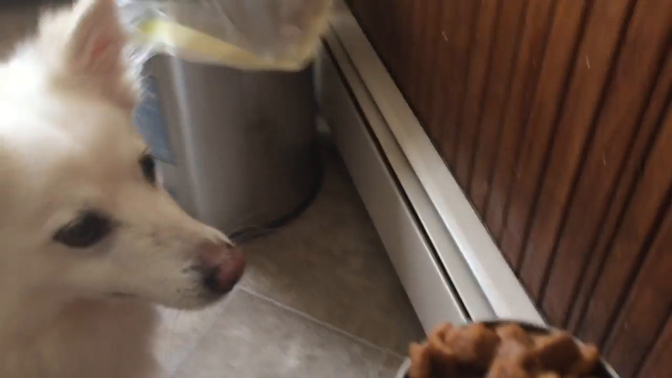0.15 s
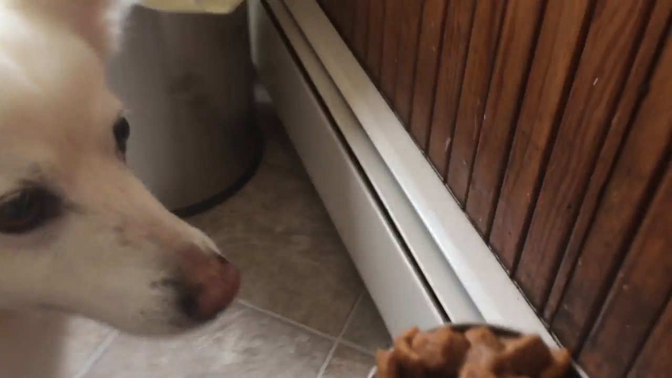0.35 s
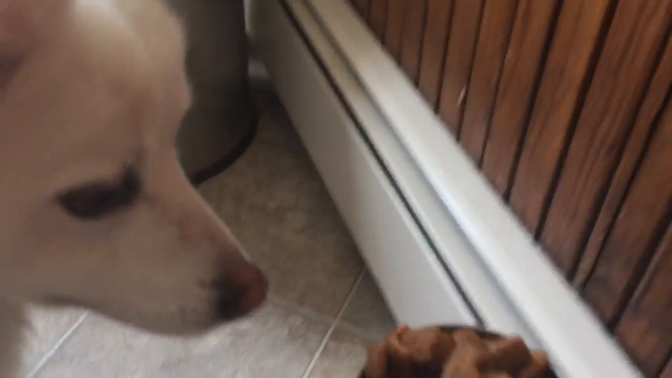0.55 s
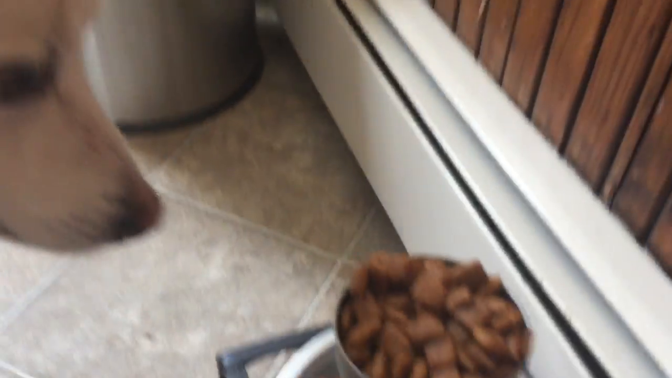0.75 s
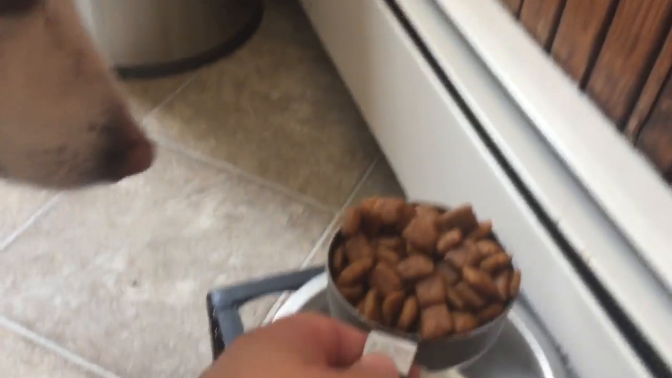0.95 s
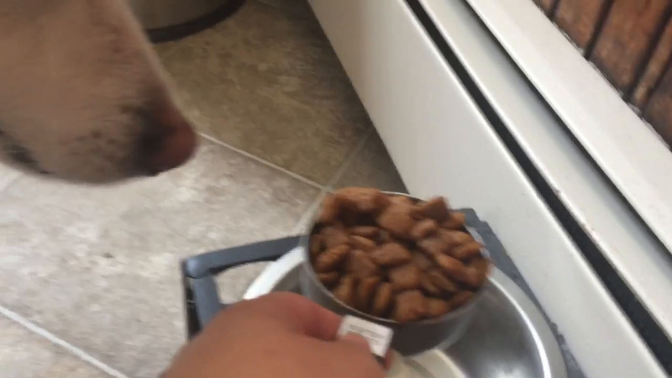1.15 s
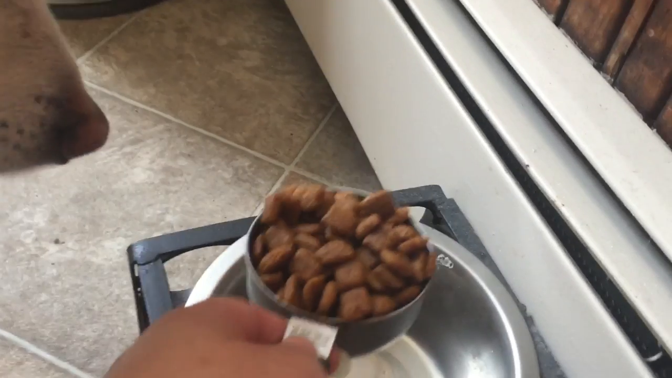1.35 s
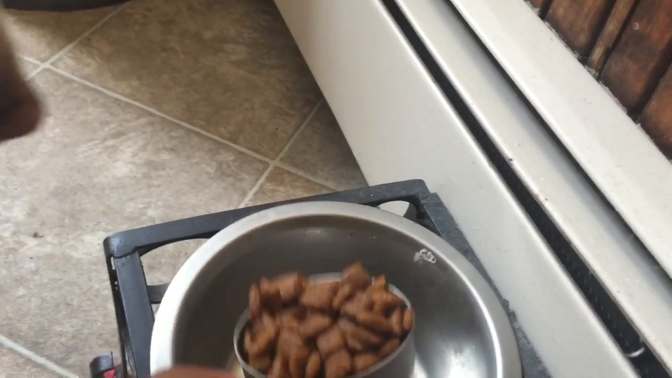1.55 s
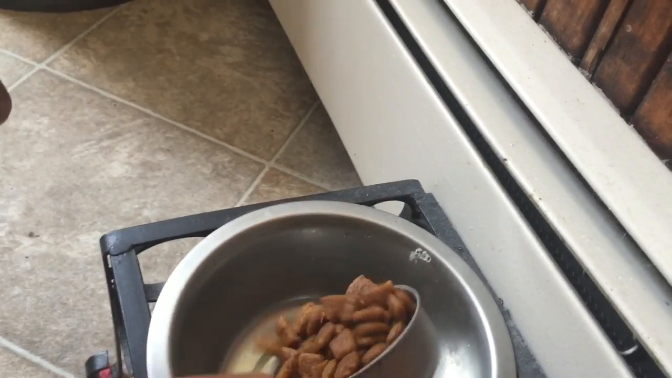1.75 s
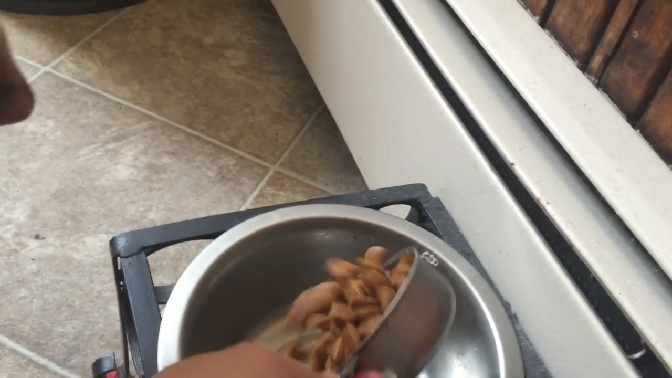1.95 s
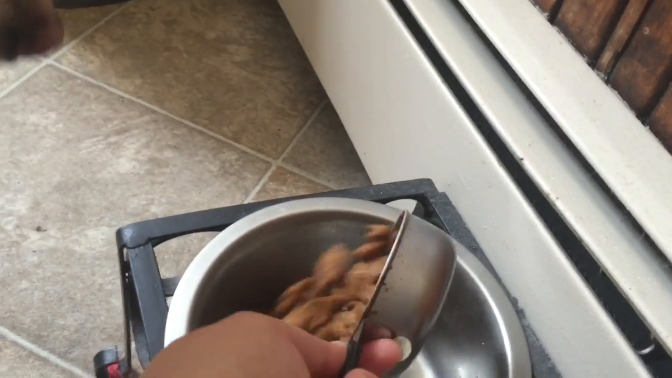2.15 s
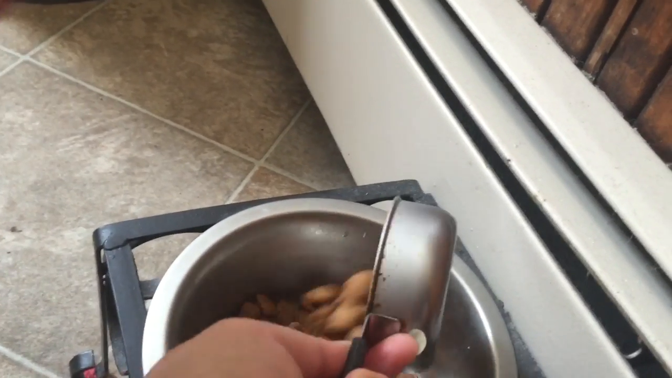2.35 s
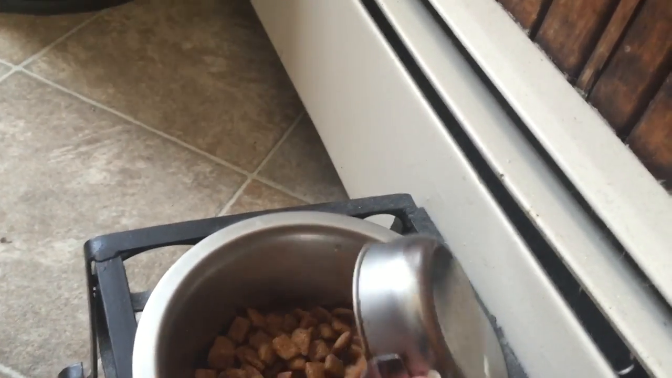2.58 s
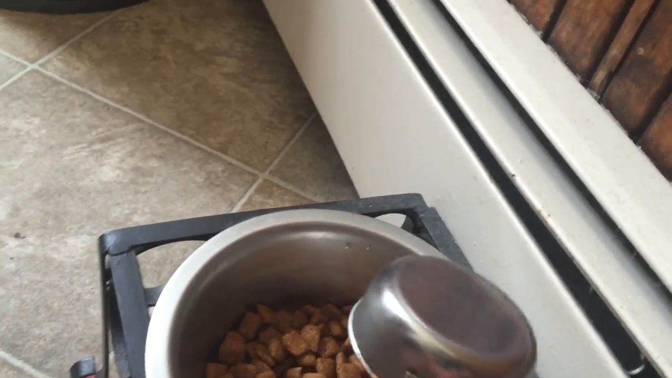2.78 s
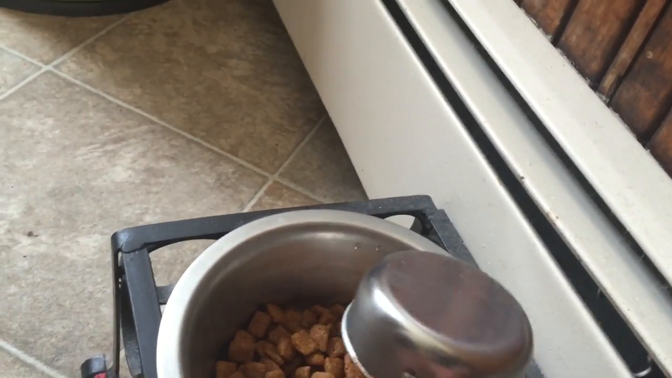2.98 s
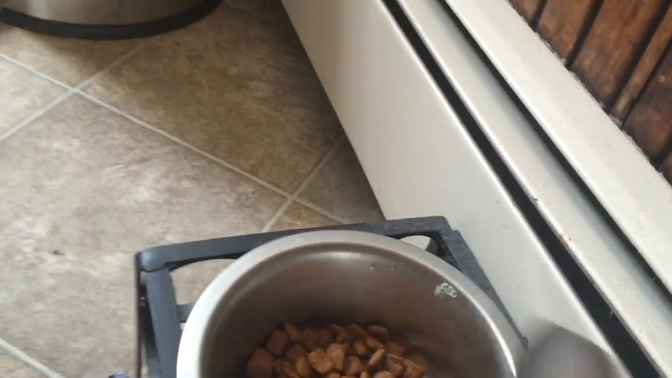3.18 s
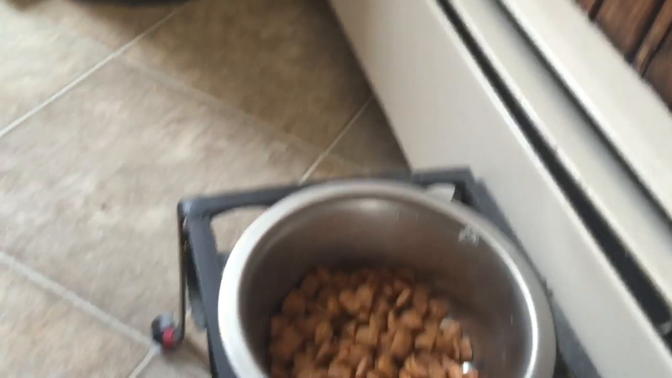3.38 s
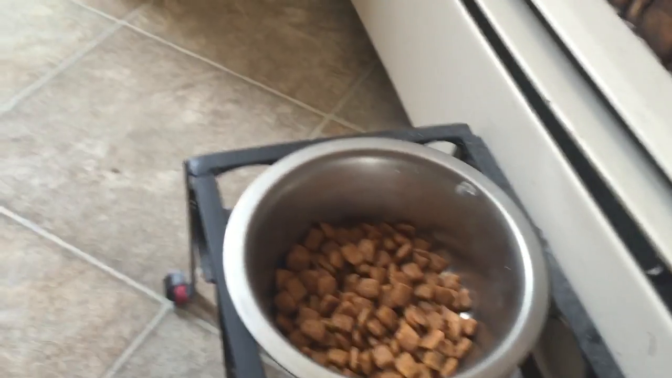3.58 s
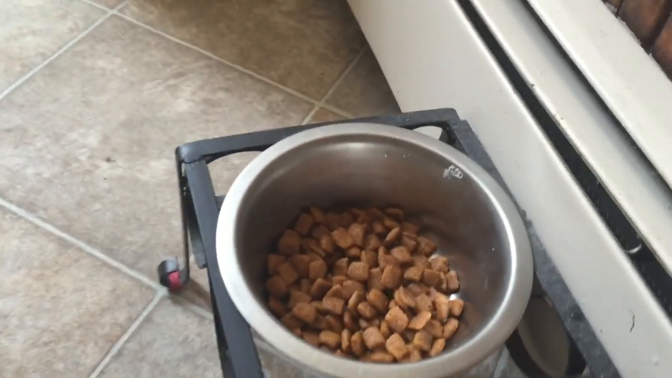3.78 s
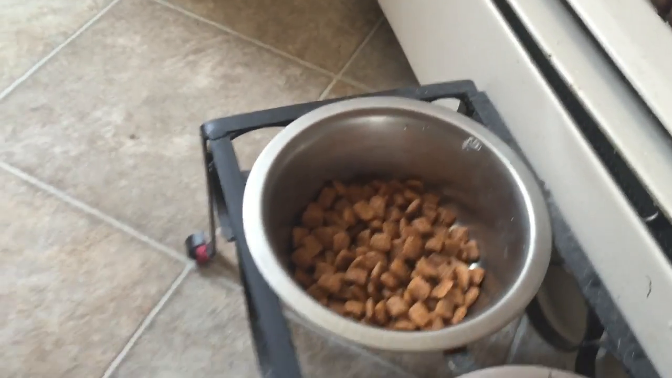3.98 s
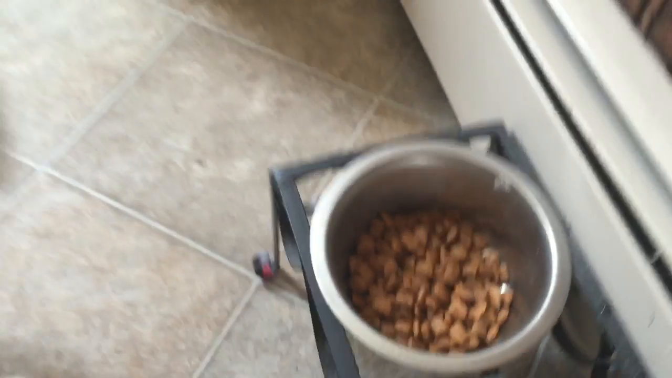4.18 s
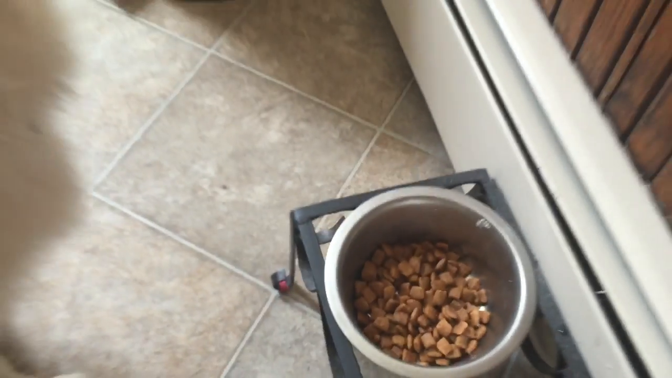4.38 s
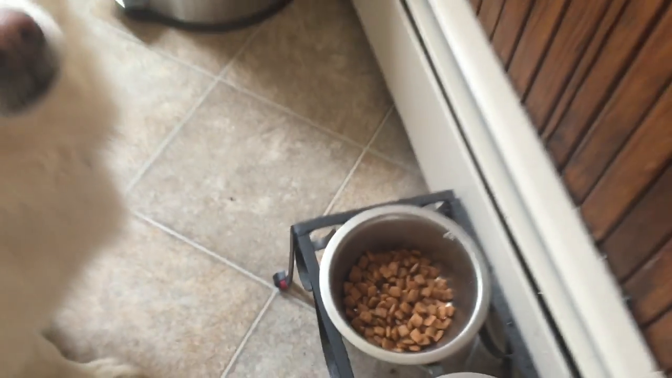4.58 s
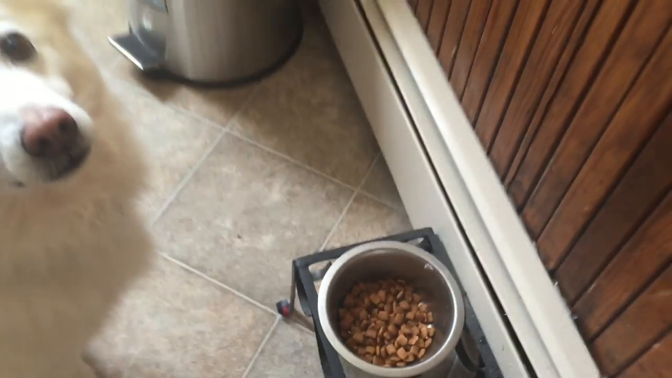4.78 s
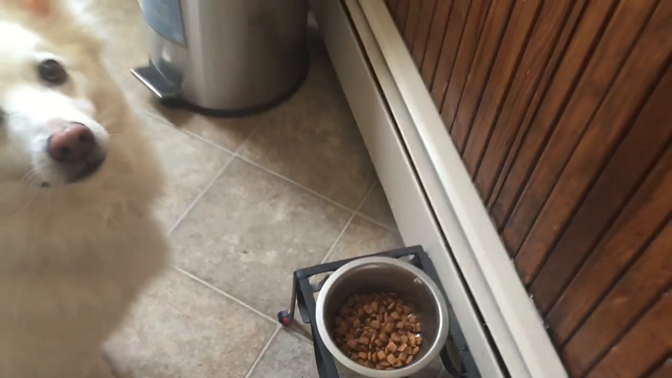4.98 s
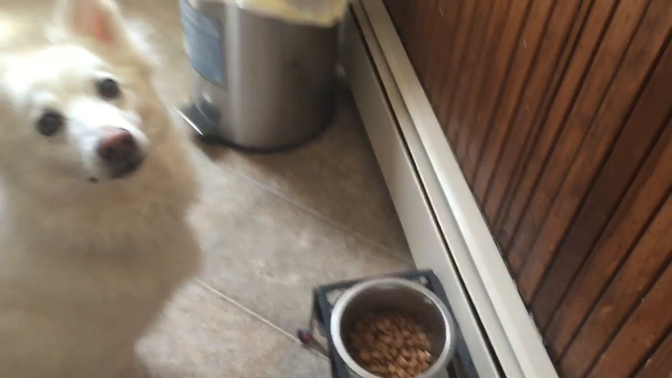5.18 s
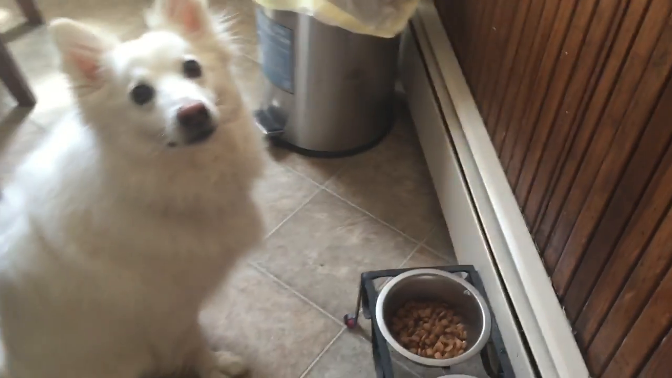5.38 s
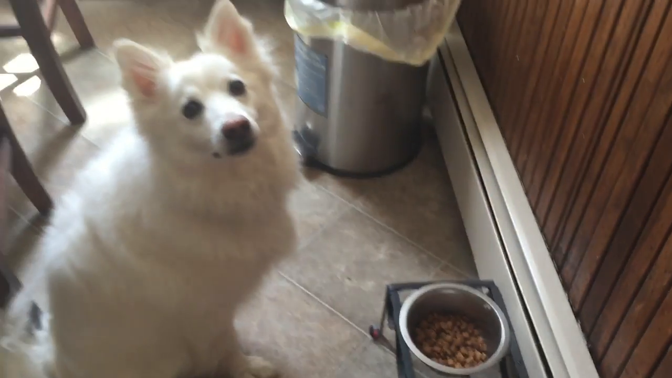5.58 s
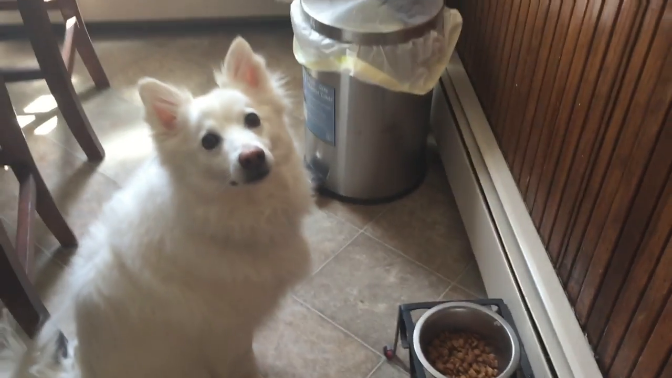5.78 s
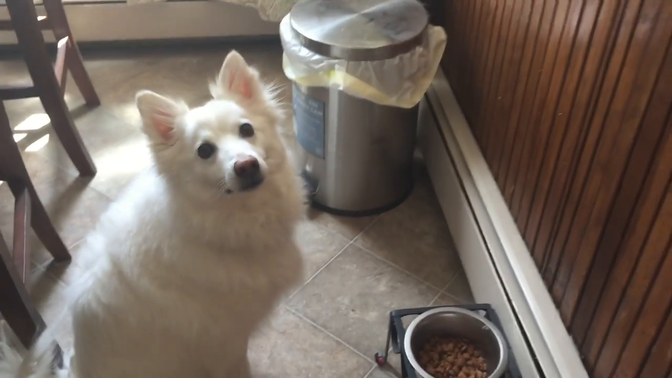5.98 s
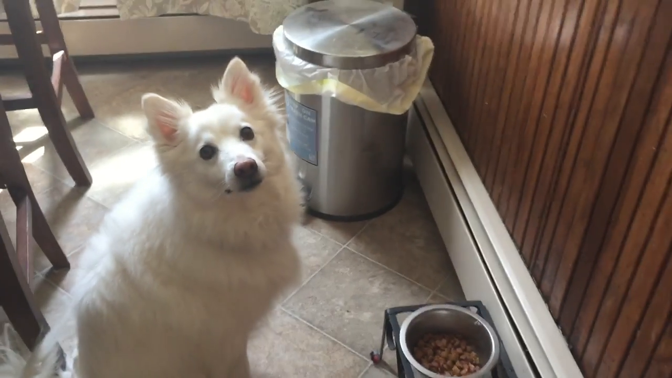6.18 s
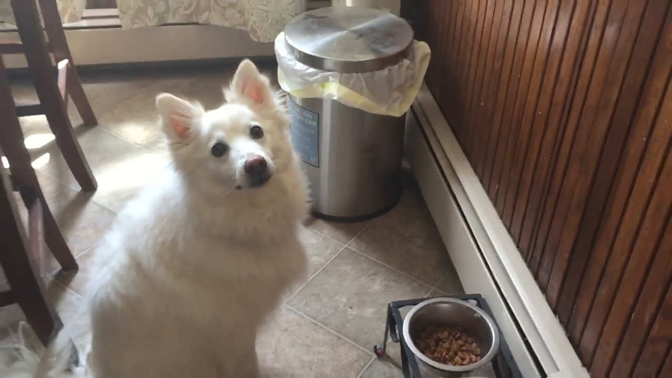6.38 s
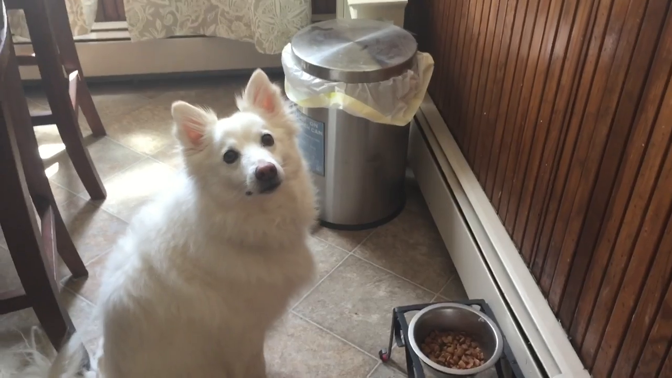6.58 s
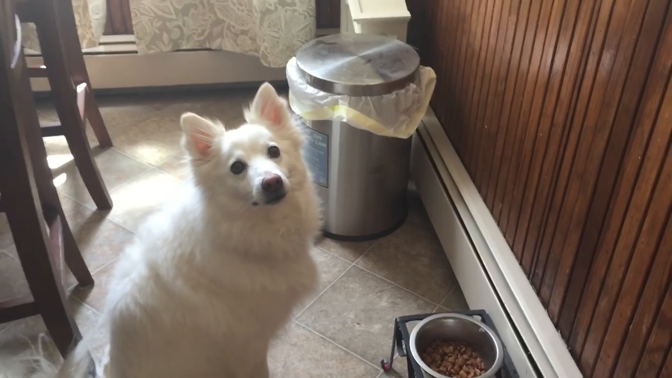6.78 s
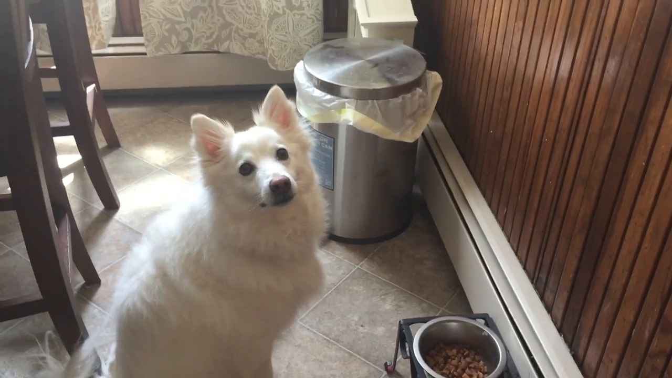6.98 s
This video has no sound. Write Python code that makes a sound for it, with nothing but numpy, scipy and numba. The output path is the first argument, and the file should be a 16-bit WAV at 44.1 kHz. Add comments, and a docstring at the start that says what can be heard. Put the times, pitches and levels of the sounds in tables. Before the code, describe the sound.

A quiet domestic kitchen with short reverberation, low rumble, wavering hum and faint hiss, heard through a close handheld microphone. From 0 to 0.7 s a dog shuffles on tile: scratchy claw ticks, strongest near 0.2 and 0.65 s with dull paw thuds, soft pad scuffs and thin high tag jingles; another clear tinkle comes at 1.0 s. Near-quiet follows until a small tick at 1.9 s. At about 1.97 s dry kibble pours from a metal cup into a steel bowl: the first pieces ring brightly, then uneven surges of clatter become a drier, duller rattle, ending around 2.87 s. A tiny tap and hissy brushing of crumbs last until 3.05 s, with a faint tag tinkle at 3.15 s. Quiet background remains. Claws tick lightly at 4.9 and 5.2 s with soft thuds, and there is a faint rub near 5.9 s. At 6.75 s something wooden is nudged in a quick dull stutter, ending near 7 s.

```python
"""Heard first: claws ticking and tags jingling as a dog trots over kitchen tiles, on low rumble and faint hiss.
Then a cup of dry kibble is tipped into a steel bowl. The first pieces ring the empty bowl; the growing heap
damps it and the pour ends as a dry rattle. Much later something wooden is nudged.
Blows ring tables of decaying modes; rubs, rattle and background are shaped noise.
The dog sends more of its sound into the room than the bowl: it is further from the microphone."""
import sys
import numpy as np
from scipy import signal
from scipy.fft import rfft, irfft
from scipy.io import wavfile
from scipy.ndimage import uniform_filter1d
from numba import njit

SR = 44100
rng = np.random.default_rng(int(sys.argv[2]) if len(sys.argv) > 2 else 0)


def waveform_to_disk(signal):
    """Save audio, clipped to [-1, 1], as 16-bit WAV at the path in sys.argv[1]."""
    frames = np.transpose(np.atleast_2d(signal))
    scaled = np.clip(frames, -1, 1) * 32767
    samples = np.round(scaled).astype(np.int16)
    wavfile.write(sys.argv[1], SR, samples)


N = 310447

# Levels in the tables are relative settings; the functions add trims of their own.
# household rumble spectrum: (f/Hz, density level/dB)
RUMBLE = [(30, -18), (54, 4), (85, 2), (117, -4.5), (160, -6.5), (214, -24), (300, -22), (430, -53.5)]
# hum lines: (f/Hz, level/dB against the rumble)
HUM = [(58.6, -9), (114, -1.5), (185, -8)]
# background hiss spectrum: (f/Hz, density level/dB)
HISS = [(130, -30), (220, -0.5), (247, -2.5), (499, -11.5), (882, -16.5), (1390, -9), (2850, -16),
        (3910, -17), (12000, -29), (15600, -59.5), (22000, -120)]
# course of rumble and hum: (t/s, level/dB)
RUMBLE_LEVEL = [(0, -48.5), (1.7, -48), (2.2, -52.5), (4.4, -51.5), (4.75, -59), (5.2, -54), (5.6, -57),
                (7.04, -57.5)]
# course of the airy top: (t/s, level/dB)
AIR_LEVEL = [(0, -51), (.9, -78.5), (3.2, -83), (3.6, -67), (4.6, -77), (5.3, -91), (7.04, -82)]
# the hiss is lifted at first, while the dog moves about
HISS_DB, STIR_DB, STIR_FADE_S, HISS_WAVER_DB = -63.5, 10.5, 0.26, .8

# pads shuffling: (t/s at peak, level/dB, swell/s, fade/s, centre f/Hz at peak)
SCUFF = [(0.005, -48, 0.013, 0.056, 1740), (0.243, -38, 0.01, 0.046, 2520),
         (0.79, -54.5, 0.065, 0.15, 1070), (5.929, -60, 0.17, 0.17, 1980), (6.86, -62, 0.23, 0.1, 2100)]
EDGE_DB = 15   # a rub swells from this far under its peak, and falls this far in one fade time
SAG_OCT_PER_S = 2   # past its peak a rub slows and its pitch sinks

# claws and small dry ticks: (t/s, level/dB, centre f/Hz, relative treble level/dB)
CLAWS = [(0.0074, -37, 1500, 10), (0.1876, -18, 1820, -2), (0.246, -25, 2480, -31),
         (0.4424, -25.5, 2720, 10), (0.6551, -13, 2480, -0.5), (1.888, -49, 3920, 2),
         (1.903, -36, 3480, -2), (2.863, -32.5, 6840, 22.5), (3.32, -70, 1507, 22),
         (4.8981, -31.5, 2620, 2.5), (4.9184, -37, 2090, -28), (5.186, -38, 896, -30),
         (5.2536, -28, 2410, -8), (6.124, -52, 5170, -3)]
# decay of a claw while the dog trots, and of a plain tick later
TROT_ENDS_S, SKID_S, TICK_S = .6, 0.01, .0046

# collar tags touching: (t/s, level/dB, then relative level/dB of low modes, upper modes, top modes)
JINGLE = [(0.0117, -36.5, -16.5, -6, -16), (0.086, -54.5, -9, -12, 8), (0.1216, -50.5, -13, -19, -13),
          (0.3337, -34.5, -23, -12, -15), (0.3422, -44, -25, 8.5, -17), (0.3986, -60.5, 1.5, -3, 9),
          (0.4436, -37.5, -10, 1, 1), (0.465, -50, -10, 15, -10), (0.5018, -45, -12, -5, 2),
          (0.5425, -42, -20.5, -7, -1), (0.628, -63, 2, -3, 20), (0.7192, -55.5, 6, 12, 12),
          (0.896, -61.5, -1.5, -3, -1), (1.0001, -27, -40, -16, -7), (1.026, -47, -7.5, 6, -8),
          (3.1399, -41.5, -19, -13, -12), (3.188, -46, -26, -12, -14)]
# tag modes: (f/Hz, level/dB, t60/s)
TAGS = [(6015, -0.5, 0.12), (6180, -4.5, 0.18), (6920, 1, 0.1), (8645, 4, 0.16), (9580, 2, 0.043),
        (11020, -13.5, 0.15), (12800, -6.5, 0.12), (14700, -14, 0.17)]
TAG_SPLIT = .0045   # relative spacing; each tag mode is a close pair that beats
TAG_SPREAD_DB = 3   # where a touch lands changes each mode by chance

# a paw's weight thuds in the floor: (t/s, level/dB, f/Hz, t60/s)
THUDS = [(.195, -30, 170, 0.073), (.21, -30, 153, 0.042), (.665, -17.5, 88, 0.14), (5.19, -30, 105, 0.052),
         (5.258, -38.5, 242, 0.066)]
THUD_SOFT_S = 0.0027   # time constant of the push

# the stream comes in surges as the cup tips: (t/s, flow level/dB)
POUR = [(1.97, -33), (2.1, -25), (2.23, -31), (2.29, -28), (2.36, -28.5), (2.46, -34.5), (2.56, -33),
        (2.61, -26.5), (2.662, -37), (2.73, -32.5), (2.8, -35.5), (2.85, -43), (2.89, -85)]
# the hardest pieces: (t/s, level/dB, share on bare steel 0-1)
DROPS = [(1.9708, 4.5, 0.85), (2.0005, 1.5, 0.05), (2.0406, -3.5, 0.55), (2.086, -0.5, 0.6),
         (2.1074, -10.5, 0.02), (2.1131, 2.5, 0.47), (2.1641, -0.5, 0.6), (2.2586, -3, 0), (2.28, 0, 1),
         (2.457, -4.5, 0.55), (2.5094, -14.5, 0), (2.536, -14.5, 0.59), (2.5687, -5, 0.57),
         (2.5942, 4.5, 0.26), (2.6155, -7, 1), (2.6728, -9, 0.56), (2.6909, -3.5, 0.02), (2.724, 0, 0.52),
         (2.7401, 2.5, 0.1), (2.7533, -27, 0), (2.7813, -7, 0.43), (2.816, -6, 0.37)]
PIECES_PER_S = 1300
# steel bowl modes: (f/Hz, level/dB, t60/s)
BOWL = [(411.5, -6, 0.99), (664.5, -11.5, .4), (878, -5, 0.77), (896.4, -4.5, 0.78), (948, -10, 0.43),
        (1874, -6.5, 0.21), (2276, -18.5, 1), (2690, -13.5, 0.36), (3042, 2, 0.17), (4140, -9, 0.2),
        (4796, -5.5, 0.2), (4940, -9.5, 0.4), (5424, -3.5, 0.31), (5640, -7.5, 0.46), (5590, -3, 0.5),
        (5680, -4.5, 0.34), (5600, -6, 0.3), (6126, -4.5, 0.5), (6170, -5.5, 0.46), (6180, -6.5, 0.55),
        (6544, -11, 0.87), (6890, -10, .25), (7225, -4.5, 0.073), (7470, -1.5, 0.13), (8478, -6, 0.17),
        (9528, -11, 0.26), (11300, -12.5, 0.15), (11100, -11, .15), (13000, -9.5, 0.18), (12930, -13, 0.17),
        (14200, -10.5, .15), (3140, -9.5, 0.22), (8360, -10.5, 0.13)]
BOWL_SPLIT = 0.0073   # relative spacing; the bowl is not quite round: every named mode is a beating pair
# the thin wall's dense crowd of weaker modes, across the range: (f/Hz, level/dB, t60/s)
WALL = [(2197, -23.5, .35), (4500, -20.5, 0.19), (8000, -12, 0.13), (11980, -10.5, .12), (15560, -17.5, .1)]
# share of the heap's damping that reaches a mode; those near the rim ring on: (f/Hz, share)
DAMPED = [(400, 0.4), (900, .6), (3000, 0.63), (6000, .9), (15000, 1.1)]
BARE_DB, COVERED_DB = 9, -17   # steel against the flow, before a trim: bowl empty and heap complete
FULL_DAMPING_DB_PER_S, DAMPING_POWER, COVER_POWER = 849, 1.9, 2.4   # growth of the heap's effect with fill
# the first piece strikes the bare floor of the bowl; later ones are too light to disturb the low modes much
LOW_MODES_HZ, FIRST_BLOW_LOW_DB, LATER_LOW_DB = 700, 10.5, -11
# kibble on kibble, spectrum: (f/Hz, density level/dB)
HEAP = [(150, -56), (250, -31), (468, -8.5), (816, -5), (1610, -11), (1820, -3), (2020, -10.5),
        (3580, -13.5), (6250, -12), (13900, -14), (16000, -22)]
THIN_HEAP_DB, HEAP_FORMS = -7.5, 0.4   # clicks start weaker; fill share over which this fades (1/e)
HOLLOW_HZ, HOLLOW_DB = 735, 1   # air in the filling bowl
# a hard piece clunks in the hollow, more as the heap deepens: (f/Hz, level/dB, t60/s)
CLUNK = [(770, -13, 0.017)]
# frame under the bowl: (f/Hz, level/dB, t60/s)
STAND = [(159, -38, 0.37)]
CUP_T60_S, CUP_DB = .3, -37   # thin steel cup; decay at 5 kHz, shorter above
LAST_TAP_S, LAST_TAP_DB = 2.8633, -43.5   # the last crumb taps the cup

# last crumbs sliding from the cup: (t/s at peak, level/dB, swell/s, fade/s)
SLIDE = [(2.87, -39, 0.013, 0.1), (3.006, -39.5, 0.052, 0.029)]
# spectrum of the slide: (f/Hz, density level/dB)
SLIDE_COLOUR = [(180, -42), (300, -4.5), (603, -7.5), (1080, -5.5), (3640, -14.5), (7080, -1.5),
                (16000, -28)]

# something wooden is nudged: (t/s, level/dB)
KNOCK = [(6.754, -44), (6.766, -36), (6.778, -34.5), (6.791, -35), (6.803, -32)]
# modes of the wood: (f/Hz, level/dB, t60/s)
WOOD = [(310.7, 0.5, 0.075), (411, -9.5, 0.088), (564, -6.5, 0.42), (921, -13, 0.14), (1022, -8, 0.1)]

ROOM_T60_S, ROOM_DB, WALL_CUT_HZ = .32, -18.5, 3100
MIC_LOW_HZ, MIC_TOP_HZ = 52, 15580


def from_db(db):
    """dB to gain."""
    return 10 ** (np.asarray(db) / 20)


def rms_one(x):
    """Scale to rms 1."""
    return x / np.sqrt(np.mean(x ** 2) + 1e-20)


def butter(x, order, hz, kind="low"):
    """Butterworth filter; a tiny offset keeps silence out of the slow denormal numbers."""
    return signal.sosfilt(signal.butter(order, hz, kind, fs=SR, output="sos"), x + 1e-18)


def in_time(rows):
    """Columns of a curve table, one value per sample."""
    s, *columns = np.transpose(rows)
    return [np.interp(np.arange(N) / SR, s, c) for c in columns]


def during(rows):
    """1 while a curve table lasts, else 0, with short ramps."""
    t = np.arange(N) / SR
    return uniform_filter1d(1. * (t > rows[0][0]) * (t < rows[-1][0]), size=200)


def add(out, s, sound):
    """Mix a sound in at time s."""
    start = round(s * SR)
    out[start:start + len(sound)] += sound


def colour(x, points):
    """Filter by a (f/Hz, level/dB) spectrum with minimum phase, so nothing sounds before a click."""
    hz, level_db = np.transpose(points)
    grid = np.maximum(np.fft.rfftfreq(8192, 1 / SR), 1)
    gain = from_db(np.interp(np.log(grid), np.log(hz), level_db))
    # folding the cepstrum forward in time gives minimum phase
    cepstrum = irfft(np.log(gain))
    cepstrum[1:4096] *= 2
    cepstrum[4097:] = 0
    impulse = irfft(np.exp(rfft(cepstrum)))
    return signal.oaconvolve(x, rms_one(impulse) / np.sqrt(8192))[:N]


def drift(rate):
    """Slow chance of a rate in Hz, spread 1: noise smoothed on every 40th sample."""
    r = np.exp(-80 * np.pi * rate / SR)
    noise = rng.standard_normal(N // 40 + 2002)
    slow = signal.lfilter([1], [1, -2 * r, r * r], noise)[2000:]
    return np.interp(np.arange(N) / 40, np.arange(len(slow)), rms_one(slow))


@njit
def struck(at, strengths, hz, t60, loss, share):
    """Modes as decaying phasors; every blow adds its own strength to each, a share of loss damps each further."""
    out = np.zeros(len(loss))
    for m in range(len(hz)):
        turn = np.exp(2j * np.pi * hz[m] / SR - np.log(1000) / (t60[m] * SR))
        state, k = 0j, 0
        for i in range(at[0], min(len(out), at[-1] + int(2 * t60[m] * SR))):
            while k < len(at) and at[k] <= i:
                state += strengths[k, m]
                k += 1
            state = (state + 1e-18) * turn * (1 - loss[i] * share[m])
            out[i] += state.imag
    return out


def blows(s, strengths, modes):
    """Ring a table of modes at the times s, without extra damping."""
    hz, mode_db, t60 = np.transpose(modes)
    order = np.argsort(s)
    at = np.round(s[order] * SR).astype(np.int64)
    return struck(at, strengths[order] * from_db(mode_db), hz, t60, np.zeros(N), np.zeros(len(hz)))


def paired(modes, split):
    """Every mode gets a weaker, shorter twin slightly above it, and the two beat."""
    return modes + [(hz * (1 + split), level_db - 5.0, 0.74 * t60) for hz, level_db, t60 in modes]


def burst(rise_s, decay_s, grain_db):
    """A contact as a short spray of uneven clicks that swells and dies; peak 1."""
    t = np.arange(4000) / SR
    spray = rng.standard_normal(len(t)) * from_db(grain_db * rng.standard_normal(len(t)))
    spray *= (1 - np.exp(-t / rise_s)) * np.exp(-t / decay_s)
    return spray / np.abs(spray).max()


def rub(peak_s, swell_s, fade_s):
    """Level of one rub under its peak in dB: an abrupt start, a straight swell, a straight fade."""
    late = np.arange(N) / SR - peak_s
    corners_s = [-swell_s - .01, -swell_s, 0, 8 * fade_s]
    return np.interp(late, corners_s, [-120, -EDGE_DB, 0, -8 * EDGE_DB])


def house():
    """Lumpy low rumble with wavering hum lines, and a patchy hiss with an airy top."""
    t = np.arange(N) / SR
    hum = np.zeros(N)
    for hz, level_db in HUM:
        hum += from_db(level_db + 2.5 * drift(13.0)) * np.sin(2 * np.pi * hz * t + drift(0.96))
    rumble = rms_one(colour(rng.standard_normal(N), RUMBLE)) * from_db(1.8 * drift(3.3))
    hiss = rms_one(colour(rng.standard_normal(N), HISS)) * from_db(HISS_WAVER_DB * drift(1.2))
    hiss += from_db(-5.0) * faint_tones()
    hiss_db = HISS_DB + STIR_DB * np.exp(-t / STIR_FADE_S)
    air = rms_one(butter(rng.standard_normal(N), 2, 8000, "high"))
    low = from_db(in_time(RUMBLE_LEVEL)[0]) * (rumble + hum)
    return low + from_db(hiss_db) * hiss + from_db(in_time(AIR_LEVEL)[0] - 3.5) * air


def faint_tones():
    """Short faint tones come and go in the mid range: chance blows, each on one of 24 resonances."""
    s = rng.uniform(0, N / SR, 900)
    chosen = rng.integers(0, 24, (900, 1)) == np.arange(24)
    strengths = rng.uniform(0.46, 1, (900, 24)) * chosen
    ring = blows(s, strengths, [(hz, 0, .2) for hz in np.geomspace(280, 2300, 24)])
    return rms_one(butter(ring, 2, 2600))


def scuffs():
    """Soft rubbing: lumpy noise shared among resonances near a centre that sinks as the rub slows."""
    noise = rng.standard_normal(N) * from_db(3.5 * drift(40))
    out = np.zeros(N)
    for peak_s, peak_db, swell_s, fade_s, centre_hz in SCUFF:
        under_db = rub(peak_s, swell_s, fade_s)
        busy = under_db > -2 * EDGE_DB
        late = np.maximum(np.flatnonzero(busy) / SR - peak_s, 0)
        now_hz = centre_hz * 2 ** (-SAG_OCT_PER_S * late)
        for hz in np.geomspace(700, 3200, 7):
            b, a = signal.iirpeak(hz, 4.0, fs=SR)
            band = rms_one(signal.lfilter(b, a, signal.lfilter(b, a, noise[busy])))
            off_centre_db = -21 * np.log2(hz / now_hz) ** 2
            out[busy] += from_db(peak_db + under_db[busy] + off_centre_db) * band
    return out


def claws():
    """Claw on tile: a scratchy spray in a band about its centre, with a treble edge."""
    out = np.zeros(N)
    for s, peak_db, centre_hz, treble_db in CLAWS:
        spray = burst(0.0013, SKID_S if s < TROT_ENDS_S else TICK_S, grain_db=4.0)
        body = butter(spray, 2, [0.59 * centre_hz, 2.3 * centre_hz], "band")
        edge = from_db(treble_db - 8.5) * butter(spray, 2, 5000, "high")
        add(out, s, from_db(peak_db + 10.0) * (body + edge))
    return butter(out, 1, 700, "high")


def tags():
    """Each touch is three quick contacts that ring the paired modes by where they land, with a faint tick."""
    s, peak_db, low_db, upper_db, top_db = np.repeat(JINGLE, 3, axis=0).T[..., None]
    pairs = paired(TAGS, TAG_SPLIT)
    hz = np.array(pairs)[:, 0]
    group_db = np.select([hz < 10000, hz < 12000, hz < 14000], [low_db - 8, 0 * s, upper_db], top_db)
    chance_db = TAG_SPREAD_DB * rng.standard_normal((len(s), len(hz)))
    strengths = from_db(peak_db + group_db + 7.5 + chance_db)
    lag = np.tile([0, .0012, .003], len(JINGLE)) * rng.uniform(.6, 1.6, len(s))
    tick = np.zeros(N)
    for row in JINGLE:
        add(tick, row[0], from_db(row[1] + 10) * burst(0.00034, 0.0055, grain_db=11.5))
    return blows(s[:, 0] + lag, strengths, pairs) + butter(tick, 3, 5500, "high")


def thuds():
    """A soft push sets one low floor resonance going."""
    t, out = np.arange(SR // 4) / SR, np.zeros(N)
    for s, peak_db, hz, t60 in THUDS:
        push = 1 - np.exp(-t / THUD_SOFT_S)
        add(out, s, from_db(peak_db - 60 * t / t60) * push * np.sin(-2 * np.pi * hz * t))
    return out


def pour():
    """Pieces land at random: on steel they ring the bowl, on the heap they only click."""
    flow_db, = in_time(POUR)
    start_s, end_s = POUR[0][0], POUR[-1][0]
    fill = np.clip((np.arange(N) / SR - start_s) / (end_s - start_s), 0, 1)
    steel_db = flow_db + BARE_DB + (COVERED_DB - BARE_DB) * fill ** COVER_POWER
    damping_db = FULL_DAMPING_DB_PER_S * fill ** DAMPING_POWER
    lands = (rng.random(N) < PIECES_PER_S / SR) & (during(POUR) > .5)
    sizes = lands * from_db(2.907 * np.minimum(rng.exponential(1, N), 3))
    s, peak_db, share = np.transpose(DROPS)
    hard = np.round(s * SR).astype(np.int64)
    steel = sizes * from_db(steel_db - 14)
    steel[hard] = share * from_db(peak_db - 13.5)
    at = np.flatnonzero(steel)

    # where a piece lands decides how strongly, and with which sign, it drives each mode
    hz, mode_db, t60, damped = bowl_modes()
    low = hz < LOW_MODES_HZ
    where = rng.uniform(0.036, 1.08, (len(at), len(hz))) * rng.choice([-1, 1], (len(at), len(hz)))
    where[1:, low] *= from_db(LATER_LOW_DB)
    where[0] = np.where(low, from_db(FIRST_BLOW_LOW_DB), np.sign(where[0]))
    loss = 1 - from_db(-damping_db / SR)
    ring = struck(at, steel[at, None] * from_db(mode_db) * where, hz, t60, loss, damped)

    thin_db = THIN_HEAP_DB * np.exp(-fill / HEAP_FORMS)
    heap = rattle(sizes * from_db(flow_db - 2.5 + thin_db))
    for t, level_db, on_steel in DROPS:
        click = burst(0.00025, .003, grain_db=6.5)
        add(heap, t, from_db(level_db - 0.5) * (1 - .5 * on_steel) * click)
    heap = butter(colour(heap, HEAP), 3, 380, "high")
    # the deeper the heap, the more each click booms in the hollow
    boom = signal.lfilter(*signal.iirpeak(HOLLOW_HZ, 5.0, fs=SR), heap)
    hollow = from_db(HOLLOW_DB) * boom * damping_db / damping_db.max()
    stand = butter(blows(s, from_db(0.13 * peak_db[:, None]) * where[:len(s), -1:], STAND), 2, 260)
    clunk = blows(s, (from_db(peak_db) * fill[hard])[:, None] * where[:len(s), -2:-1], CLUNK)
    return ring + clunk + heap + hollow + stand + cup(at, (sizes * from_db(flow_db))[at])


def bowl_modes():
    """The named pairs plus the wall's crowd at chance pitches, each with its share of damping."""
    hz, level_db, t60 = np.transpose(WALL)
    crowd_hz = np.geomspace(hz[0], hz[-1], 70) * rng.uniform(.985, 1.015, 70)
    crowd_db = np.interp(crowd_hz, hz, level_db) + rng.normal(0, 3, 70)
    crowd = np.transpose([crowd_hz, crowd_db, np.interp(crowd_hz, hz, t60)])
    hz, level_db, t60 = np.vstack([paired(BOWL, BOWL_SPLIT), crowd]).T
    return hz, level_db, t60, np.interp(hz, *np.transpose(DAMPED))


def rattle(landings):
    """Each piece has a pitch range of its own and shakes its neighbours for a few milliseconds."""
    edges = np.geomspace(380, 19000, 7)
    landed = np.flatnonzero(landings)
    busy = slice(landed[0], landed[-1] + 2000)
    landings, out = landings[busy], np.zeros(N)
    dealt = rng.integers(0, 6, len(landings))
    for k, (low, high) in enumerate(zip(edges, edges[1:])):
        # a piece sounds in its own band and the adjoining ones
        mine = landings * (np.abs(dealt - k) < 1.5)
        shake = signal.lfilter([1], [1, -np.exp(-1 / (.004 * SR))], mine + 1e-18)
        out[busy] += butter(shake * rng.standard_normal(len(shake)), 2, [low, high], "band")
    return out


def cup(at, sizes):
    """The thin cup has a dense crowd of treble modes, brushed by the pieces that leave it."""
    hz = np.geomspace(4100, 14500, 50) * rng.uniform(.99, 1.01, 50)
    s = np.append(at / SR, LAST_TAP_S)
    sizes = np.append(sizes * from_db(CUP_DB), from_db(LAST_TAP_DB))
    strengths = sizes[:, None] * rng.uniform(-1, 1, (len(s), 50))
    return blows(s, strengths, [(f, 0, CUP_T60_S * 5000 / f) for f in hz])


def slide():
    """Crumbs and the cup's edge brush past in a thin grainy hiss: noise under rub envelopes."""
    grains = rng.standard_normal(N) * from_db(drift(49))
    level = sum(from_db(peak_db + rub(s, swell_s, fade_s)) for s, peak_db, swell_s, fade_s in SLIDE)
    return level * rms_one(colour(grains, SLIDE_COLOUR))


def knock():
    """A stutter of soft contacts: each a dull scratch that rings the wood's modes."""
    s, peak_db = np.transpose(KNOCK)
    strengths = from_db(peak_db[:, None] - 5.0) * rng.uniform(0.48, 1, (len(s), len(WOOD)))
    out = blows(s, strengths, WOOD)
    for t, level_db in KNOCK:
        add(out, t - .008, from_db(level_db + 7.5) * burst(0.005, 0.015, grain_db=-2.5))
    return butter(out, 4, [230, 1150], "band")


def kitchen(x):
    """Reverberation: decaying noise, duller towards its end as the treble dies sooner."""
    t = np.arange(int(.8 * SR)) / SR
    noise = rng.standard_normal(len(t)) * (t > .004)
    dull = butter(noise, 1, WALL_CUT_HZ)
    bright = noise - dull
    tail = dull * from_db(-60 * t / ROOM_T60_S) + bright * from_db(-60 * t / (0.35 * ROOM_T60_S))
    return signal.fftconvolve(x, tail / np.sqrt(np.sum(tail ** 2)))[:N]


def scene():
    """The dog is further off and wetter than the bowl; thuds, scuffs and background stay dry."""
    background, scuffing = house(), scuffs()
    dog = claws() + tags()
    bowl, wood = pour() + slide(), knock()
    wet = kitchen(from_db(10.0) * dog + bowl + wood)
    return (dog + bowl + wood + thuds() + from_db(ROOM_DB) * wet + scuffing + background)[None]


def record(dry):
    """The microphone drops the deepest bass, peaks are rounded, the top is cut."""
    x = signal.sosfilt(signal.butter(3, MIC_LOW_HZ, "high", fs=SR, output="sos"), dry)
    top_cut = signal.ellip(10, .5, 95, MIC_TOP_HZ, fs=SR, output="sos")
    return signal.sosfilt(top_cut, np.tanh(x))


dry = scene()
out = record(dry)
waveform_to_disk(out)
```